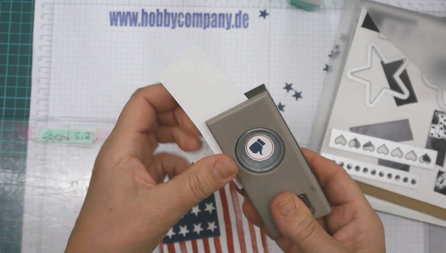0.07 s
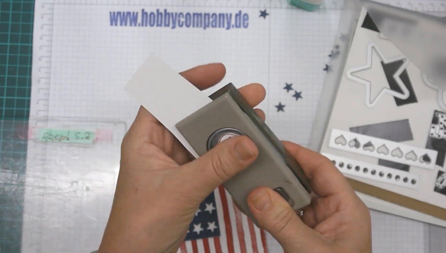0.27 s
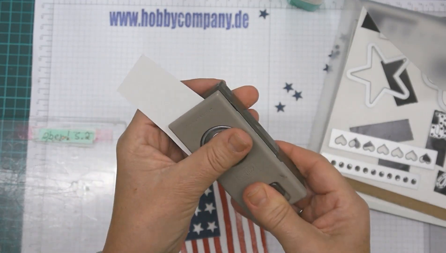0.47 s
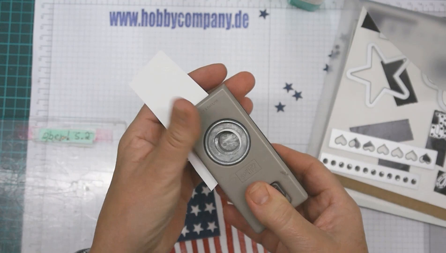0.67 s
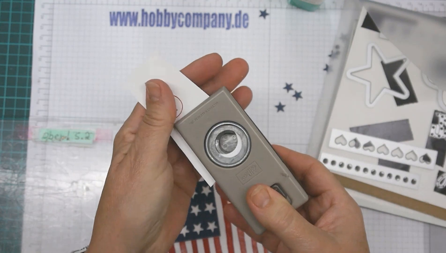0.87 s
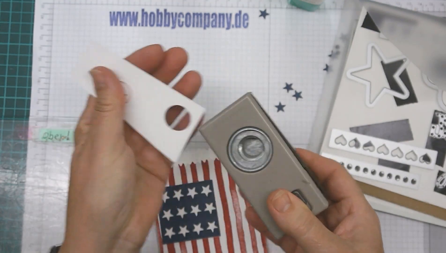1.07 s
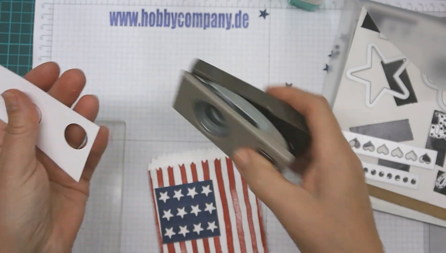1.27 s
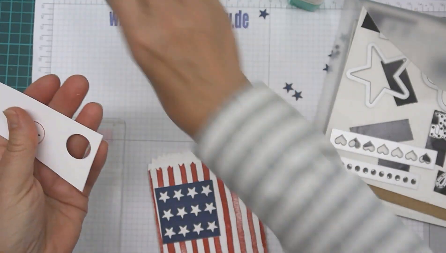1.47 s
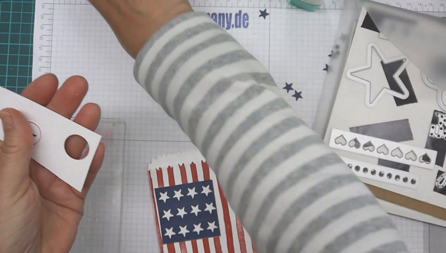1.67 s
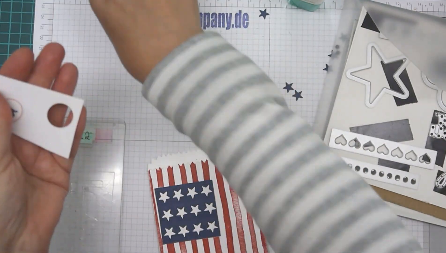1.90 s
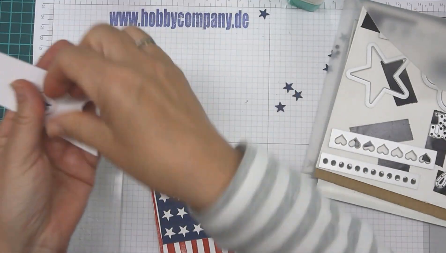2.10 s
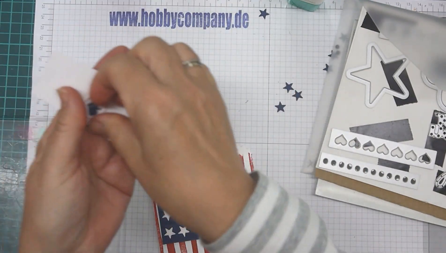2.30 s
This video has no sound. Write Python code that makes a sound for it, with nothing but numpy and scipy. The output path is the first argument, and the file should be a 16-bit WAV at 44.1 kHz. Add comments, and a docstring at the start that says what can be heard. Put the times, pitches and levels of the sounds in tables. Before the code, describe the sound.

Close up in a small quiet room, a paper punch bites through cardstock with a creaking crunch and loud double snap, followed by faint paper scrapes, a hard tabletop knock and tiny card flicks.

```python
"""A hand-held circle punch is squeezed through cardstock: its lever clacks, the die creaks in and snaps through.
The card ticks and slides out, the punch touches the craft table and is set down with a sharp knock, and
fingers flick the card. Hard contacts are noise bursts and fading tones, creaks are wavering tones, and
sliding card is uneven noise.
A small, quiet room rings briefly behind a close microphone, over a faint hush of coloured noise."""
import sys
import numpy as np
from scipy import signal
from scipy.fft import rfft, irfft
from scipy.io import wavfile
from scipy.ndimage import uniform_filter1d

SR = 44100
rng = np.random.default_rng(int(sys.argv[2]) if len(sys.argv) > 2 else 0)


def dump_mix(stems):
    """Bounce the given channels to the path in sys.argv[1] as a 16-bit WAV at rate SR."""
    frames = np.atleast_2d(stems).T  # one column per channel
    limited = np.clip(frames, -1, 1)  # hard clip at full scale
    pcm = np.round(limited * 32767).astype(np.int16)
    wavfile.write(sys.argv[1], SR, pcm)


N = 103282  # length of the scene in samples


def amp(db):
    """Turn decibels into a gain."""
    return 10 ** (np.asarray(db) / 20)


def add(out, start, x):
    """Mix a sound in at a time in seconds."""
    i = max(int(start * SR), 0)
    out[i:i + len(x)] += x[:max(N - i, 0)]


def colour(x, points):
    """Shape the spectrum through (Hz, dB) points without smearing backwards; white noise keeps its power."""
    hz, db = np.array(points, float).T
    bins_hz = np.arange(2049) * SR / 4096
    gain = amp(np.interp(np.log(bins_hz + 1), np.log(hz), db))
    gain = gain / np.sqrt(np.mean(gain ** 2))
    # fold the cepstrum forwards, so that the filter responds as early as it can
    cepstrum = irfft(np.log(gain))
    cepstrum[1:2048] *= 2
    cepstrum[2049:] = 0
    response = irfft(np.exp(rfft(cepstrum)))
    return signal.fftconvolve(x, response)[:len(x)]


def fade(t60):
    """Exponential decay, half a second long, that falls by 60 dB in t60 seconds."""
    return np.exp(-np.log(1000) * np.arange(SR // 2) / SR / t60)


def crack(decay):
    """A short noise burst: its spectrum is levelled, then it is faded more gently than the decay."""
    env = fade(decay)
    burst = rng.standard_normal(len(env)) * env
    even = irfft(np.exp(1j * np.angle(rfft(burst))), len(env))  # same phases, equal strengths
    return even * env ** 0.19 * np.sqrt(np.sum(env ** 2))


def ring(modes, ratio, rise):
    """Fading tones of a struck object, tuned by a ratio, that build up smoothly over the rise in seconds."""
    t = np.arange(SR // 2) / SR
    tones = sum(amp(db) * fade(t60) * np.sin(2 * np.pi * hz * ratio * t) for hz, db, t60 in modes)
    return (1 - np.exp(-(t / rise) ** 2)) * tones


def dull(x, hz):
    """A softer contact loses its treble above a frequency."""
    return signal.lfilter(*signal.butter(2, hz, fs=SR), x)


def grains():
    """Dense paper fibres that scrape in uneven catches: noise whose strength varies at two speeds."""
    fibres = np.repeat(rng.standard_normal(N // 32 + 1), 32)[:N]  # one strength for every 32 samples
    catch_s = 0.016
    catches = np.interp(np.arange(N) / SR / catch_s, np.arange(N), rng.standard_normal(N))
    size = amp(3.8 * fibres + 2 * catches)  # spreads in dB
    return rng.standard_normal(N) * size / np.sqrt(np.mean(size ** 2))


# The tint of the hush. Each row: frequency in Hz, relative level in dB.
HUSH_TINT = [(25, -0.5), (60, 5), (120, 2), (220, 2.5), (320, 8.5), (430, 0), (750, 0), (1500, -5),
             (3200, -17.5), (6000, -12), (11000, -12.5), (13000, -20), (16000, -27)]


def hush():
    """The faint hush of the quiet room is steady coloured noise."""
    return amp(-67.5) * colour(rng.standard_normal(N), HUSH_TINT)


# Clacks of the punch and ticks of the card. Each row: start in seconds, hollow ring level in dB,
# ring pitch in Hz, crack level in dB, crack decay setting in seconds,
# frequency in Hz above which the crack is dull.
CLACKS_AND_TICKS = [(0.0647, -34, 1340, -30, 0.046, 14500), (0.0676, -15, 1672, -26, 0.024, 13500),
                    (0.1024, -7.5, 1531, -28, 0.047, 6040), (0.154, -38, 1520, -51, 0.034, 11100),
                    (0.1873, -35.5, 1463, -46, 0.048, 7100), (0.375, -2.5, 1528, -18, 0.024, 10850),
                    (0.4829, -1, 1394, -10.5, .011, 14500), (.488, -7.5, 1290, -7, 0.014, 12050),
                    (0.6313, -50, 1386, -35, 0.0092, 3200), (0.7403, -40, 1630, -38.5, 0.016, 3130),
                    (0.8519, -57, 1580, -43, 0.015, 10000), (0.9579, -37.5, 1690, -36, 0.0067, 5500),
                    (1.299, -45, 1506, -55.5, 0.022, 3965)]
# Tones of the hollow ring. Each row: multiple of the ring pitch, level in dB, fade time (60 dB) in seconds.
HOLLOW_TONES = [(.42, -25.5, 0.025), (.8, -16, 0.03), (1, 1, 0.018), (1.2, -20.5, 0.038),
                (2.15, -26.5, 0.013), (3.05, -29, 0.031)]
# Tones of the high ping. Each row: pitch in Hz before tuning, level in dB against its crack,
# fade time (60 dB) in seconds.
PING_TONES = [(2430, -19, .085), (4850, -12, .014), (5230, -17, .012), (5900, -15, 0.016),
              (7820, -14, 0.018)]
# The tint of the cracks and pings. Each row: frequency in Hz, relative level in dB.
CLACK_TINT = [(120, -13.5), (300, -6.5), (550, 1), (950, 0.5), (1700, 8), (2150, -1), (2700, -3),
              (3300, -5), (5000, 1), (6800, -3.5), (10500, 0.5), (12500, -8.5), (16000, -21.5)]


def clacks_and_ticks():
    """Each clack or tick is a crack, a short high ping and a brief hollow ring."""
    rings, cracks = np.zeros((2, N))
    ping = ring(PING_TONES, 0.95, 0.00022)
    for start, ring_db, hz, crack_db, decay, dull_hz in CLACKS_AND_TICKS:
        add(rings, start, amp(ring_db) * ring(HOLLOW_TONES, hz, 0.0022))
        add(cracks, start, amp(crack_db) * dull(crack(decay) + ping, dull_hz))
    return rings + colour(cracks, CLACK_TINT)


# Clinks of the lever. Each row: start in seconds, level in dB.
LEVER_TAPS = [(.065, -28), (.0678, -23), (.1027, -24), (.1065, -30)]
# Tones of the lever. Each row: pitch in Hz before tuning, relative level in dB, fade time (60 dB) in seconds.
LEVER_TONES = [(3330, 0, .009), (4700, -2, .013), (7640, -11, .016)]


def lever():
    """The lever clinks: each tap sets off the same few fast-fading tones."""
    clinks = np.zeros(N)
    for start, db in LEVER_TAPS:
        add(clinks, start, amp(db) * ring(LEVER_TONES, 0.98, 0.00022))
    return clinks


# The tint of the room's echo. Each row: frequency in Hz, relative level in dB.
ROOM_TINT = [(60, -7), (200, -2), (310, 2), (430, -5), (950, -0.5), (1350, -4), (1650, -1.5), (2450, -1.5),
             (5000, 0.5), (9000, 0), (12000, -3.5), (16000, -3.5)]


def room_tail():
    """Diffuse reflections that set in after a few milliseconds; bass and treble die sooner than the middle."""
    noise = rng.standard_normal(SR // 2)
    size = len(noise)
    hz = np.arange(size // 2 + 1) * SR / size
    bass = irfft(rfft(noise) * (hz < 815), size)
    treble = irfft(rfft(noise) * (hz > 5100), size)
    middle = noise - bass - treble
    onset_s = 0.0052
    onset = 1 - np.exp(-(np.arange(size) / SR / onset_s) ** 2)
    tail = onset * (bass * fade(0.31) + middle * fade(0.35) + treble * fade(0.32))
    return colour(tail / np.sqrt(np.sum(tail ** 2)), ROOM_TINT)


# The card slides and catches on the punch and skin. Each row: strongest moment in seconds, swell time in seconds,
# fall time in seconds, level in dB before the edge sings, resonance of the edge in Hz.
RUBS = [(0.3737, 0.0013, 0.0023, -41.5, 5000), (0.682, 0.033, 0.088, -53.5, 7000),
        (0.87, 0.011, 0.026, -53.5, 5800), (0.95, 0.035, 0.02, -58.5, 4600),
        (1.186, 0.087, 0.038, -61, 2900), (1.161, 0.008, .016, -55.5, 3250), (1.206, 0.02, 0.01, -53, 3100),
        (1.122, .13, 0.069, -64, 6200), (1.366, 0.16, 0.16, -68.5, 4900), (1.642, 0.2, 0.19, -73, 7000)]
# The tint of the scrapes. Each row: frequency in Hz, relative level in dB.
RUB_TINT = [(150, -8.5), (350, 1.5), (660, 6), (1050, -8), (1700, -1.5), (2400, -2.5), (4200, -1),
            (6500, -0.5), (10500, 0), (13000, -7.5), (16000, -27)]


def scrapes():
    """The card scrapes out of the slot: swells of fibre noise with a resonance added for the singing edge."""
    t, fibres, out = np.arange(N) / SR, grains(), np.zeros(N)
    for at, swell, fall, db, hz in RUBS:
        swelling = np.exp(-2 * ((t - at) / np.where(t < at, swell, fall)) ** 2)
        scrape = amp(db) * swelling * fibres
        edge = signal.lfilter(*signal.iirpeak(hz, 7, fs=SR), scrape)
        out += scrape + edge
    return colour(out, RUB_TINT)


def squeal(hz, wobble):
    """Friction locked onto a resonance: a tone whose pitch strays at random by the wobble, a share of the pitch."""
    drift = uniform_filter1d(rng.standard_normal(N), size=48)
    pitch = hz * (1 + wobble * drift / drift.std())
    return np.sin(2 * np.pi * np.cumsum(pitch) / SR)


# Slips of the die as it bites into the card and lets go. Each row: strongest moment in seconds, length in seconds,
# squeak level in dB, shrill squeak level in dB, rasp level in dB.
SLIPS = [(0.426, 0.07, -39.5, -58, -41.5), (0.4091, .011, -26, -32.5, -33),
         (0.414, 0.0065, -26.5, -40.5, -45.5), (0.4234, .0035, -28, -27.5, -29.5),
         (0.426, .006, -23.5, -35, -40.5), (0.434, 0.009, -25.5, -33.5, -37.5),
         (0.45, 0.01, -33, -35.5, -37), (0.4559, 0.0055, -22, -33, -34.5),
         (0.4606, 0.009, -27.5, -36.5, -36.5), (0.482, 0.0044, -20, -23, -27),
         (.9592, .004, -73, -38, -42.5)]
# The tint of the rasp. Each row: frequency in Hz, relative level in dB.
RASP_TINT = [(200, -8), (900, -2), (1600, 4.5), (2500, -4.5), (4200, -4), (4950, 6), (5900, -4),
             (10500, -9.5), (13000, -21), (16000, -42)]


def cutting():
    """The die slips in spurts: housing and die squeak while fibres tear."""
    squeak, shrill, rasp = np.zeros((3, N))
    for centre, length, *levels in SLIPS:
        spurt = np.hanning(int(length * SR))
        for layer, db in zip((squeak, shrill, rasp), levels):
            add(layer, centre - length / 2, amp(db) * spurt)
    squeaks = squeak * squeal(1526, 0.07) + shrill * squeal(4940, 0.035)
    return squeaks + colour(rasp * grains(), RASP_TINT)


# Flaps of the card. Each row: start in seconds, level in dB.
FLAPS = [(.867, -50.5), (.959, -44.5)]


def flaps():
    """The card flaps free: each flap is one low, fast-fading tone."""
    out = np.zeros(N)
    for start, db in FLAPS:
        add(out, start, ring([(495.69, db, 0.041)], 1, 0.0012))
    return out


# Flicks of the card's edge. Each row: start in seconds, level in dB.
FLICKS = [(1.546, -53), (2.265, -42.5), (2.2713, -48), (2.276, -43.5), (2.287, -46.5)]
# The tint of the flicks. Each row: frequency in Hz, relative level in dB.
FLICK_TINT = [(300, -1), (2000, -18), (5000, -9.5), (7000, -3), (9300, 3), (12000, 0.5), (16000, -32.5)]


def flicks():
    """Fingertips flick the card's edge: each flick is a small crack."""
    out = np.zeros(N)
    for start, db in FLICKS:
        add(out, start, amp(db) * crack(0.024))
    return colour(out, FLICK_TINT)


# The punch meets the table. Each row: start in seconds, thud level in dB, thud pitch in Hz before tuning,
# table ring level in dB, shell ring level in dB, crack level in dB, crack decay setting in seconds,
# frequency in Hz above which the crack is dull.
KNOCKS = [(1.860, -22.5, 280, -14.5, -32, -31.5, 0.053, 5610),
          (1.877, -30, 110, -1, -54, -40.5, 0.044, 3000),
          (1.9875, -38.5, 400, -18.5, -48.5, -46, 0.21, 2430),
          (2.0104, 7.5, 463, -1.5, -12, -15.5, 0.05, 10900), (2.0406, -15, 430, -19, -47, -38, 0.04, 7000)]
# Tones of the table top. Each row: pitch in Hz before tuning, level in dB before the thud's softness,
# fade time (60 dB) in seconds.
TABLE_TONES = [(82.4, -40.5, 0.19), (172.4, -42, 0.36), (234.6, -25, 0.11), (334.8, -14, 0.045),
               (490, -8, 0.023), (550, -19, 0.072), (694, -15, 0.06), (927, -30.5, 0.03)]
# Tones of the punch's metal shell. Each row: pitch in Hz, relative level in dB, fade time (60 dB) in seconds.
SHELL_TONES = [(1520, -7, 0.04), (1950, -5, .016), (2740, 0, 0.016), (4250, -1, 0.006), (5080, -3, 0.009),
               (6090, -8, .011)]
# The tint of the knocks' cracks. Each row: frequency in Hz, relative level in dB.
KNOCK_TINT = [(80, -8.5), (600, 0.5), (1100, -1.5), (1600, -0.5), (2300, -2.5), (3200, -11), (4500, -3),
              (7000, -7), (11000, -5), (13000, -9.5), (16000, -19.5)]


def table():
    """The punch is put down: the contact thuds and cracks over the ringing table top, and the punch's shell rings."""
    out, cracks = np.zeros((2, N))
    for start, thud_db, hz, top_db, shell_db, crack_db, decay, dull_hz in KNOCKS:
        thud = ring([(hz, thud_db, 0.0085)], 0.98, 0.0012)
        # a soft thud barely moves the table tones above its own pitch
        moved = [(f, db - 20 * np.log10(1 + (f / hz) ** 2), t60) for f, db, t60 in TABLE_TONES]
        add(out, start, thud + amp(top_db) * ring(moved, 0.99, 0.0012))
        add(out, start, amp(shell_db) * ring(SHELL_TONES, 1, 0.0015))
        add(cracks, start, amp(crack_db) * dull(crack(decay), dull_hz))
    return out + colour(cracks, KNOCK_TINT)


# The tint of the difference between left and right. Each row: frequency in Hz, relative level in dB.
SIDE_TINT = [(200, -16.5), (700, -5.5), (1400, -2), (2700, 2), (6000, -3), (13000, 1)]


def scene():
    """Hands and table in the centre, the room and its faint hush around them."""
    hands = clacks_and_ticks() + lever() + scrapes() + cutting() + flaps() + flicks()
    knocks = table()
    send = amp(-12) * hands + amp(-8) * knocks  # what reaches the room
    echo_mid, echo_side = (signal.fftconvolve(send, room_tail())[:N] for _ in range(2))
    mid = hands + knocks + echo_mid + hush()
    side = colour(amp(-3.5) * echo_side + amp(3.5) * hush(), SIDE_TINT)
    return np.array([mid + side, mid - side])


def record(dry):
    """The recorder cuts the top above 15800 Hz and sits slightly off zero."""
    top_cut = signal.ellip(8, 0.2, 70, 15800, fs=SR, output="sos")
    return signal.sosfilt(top_cut, dry) - 0.0019


dry = scene()
out = record(dry)
dump_mix(out)
```